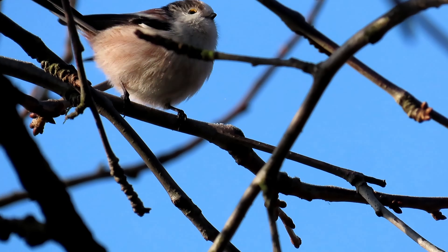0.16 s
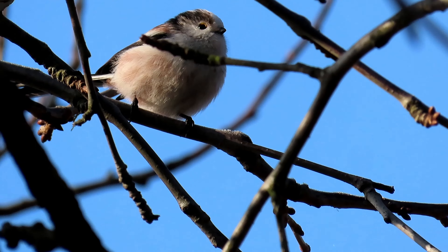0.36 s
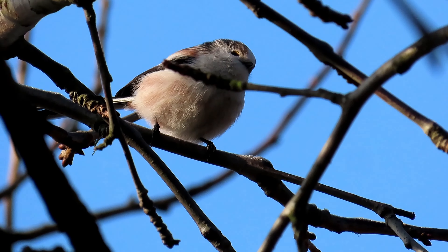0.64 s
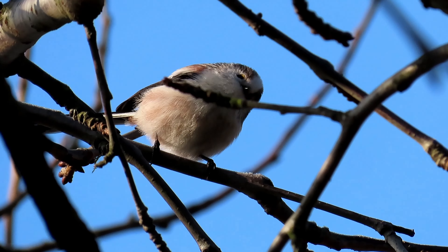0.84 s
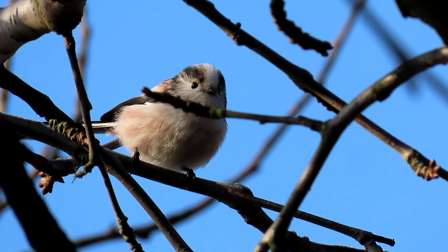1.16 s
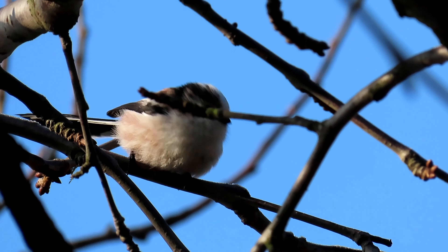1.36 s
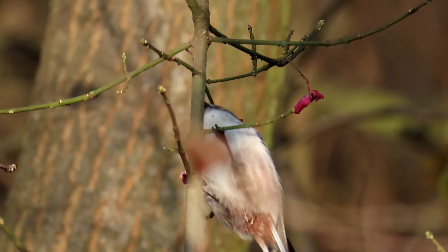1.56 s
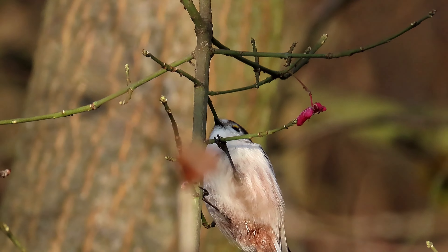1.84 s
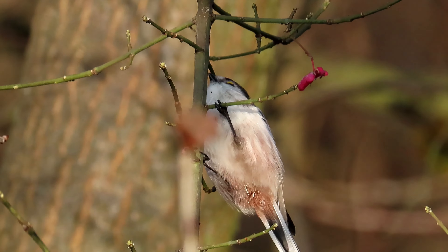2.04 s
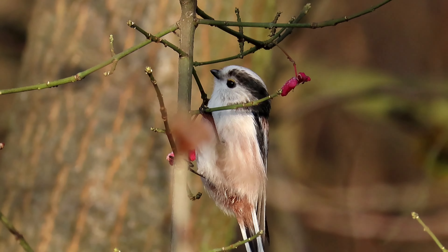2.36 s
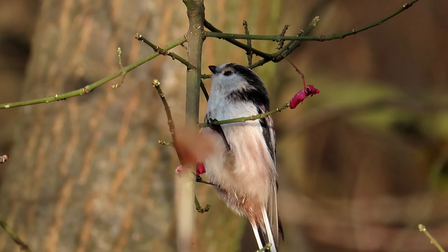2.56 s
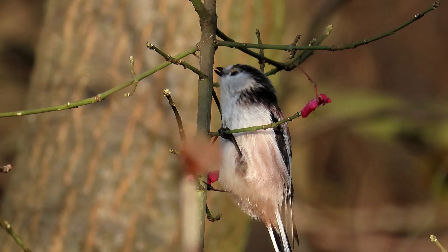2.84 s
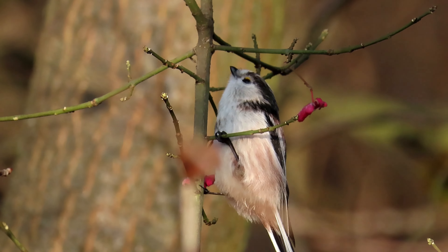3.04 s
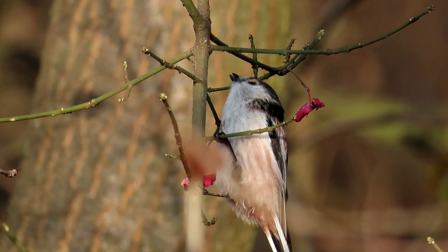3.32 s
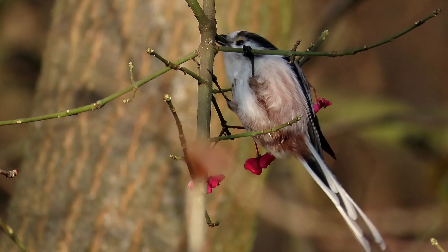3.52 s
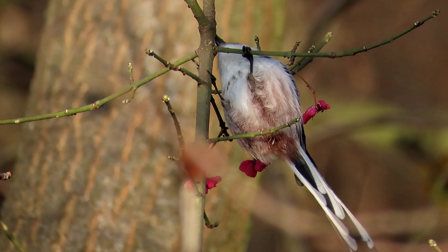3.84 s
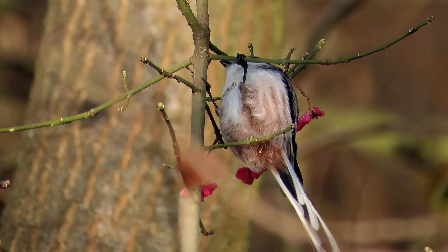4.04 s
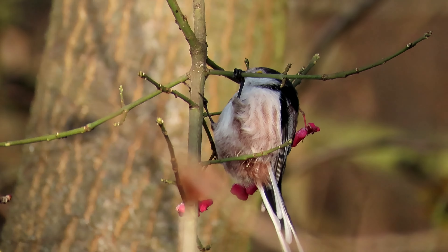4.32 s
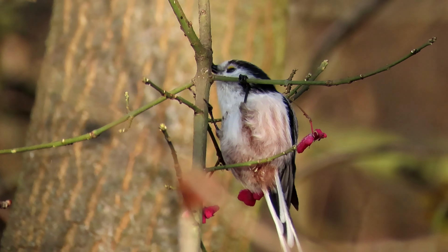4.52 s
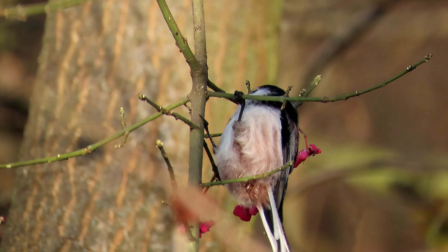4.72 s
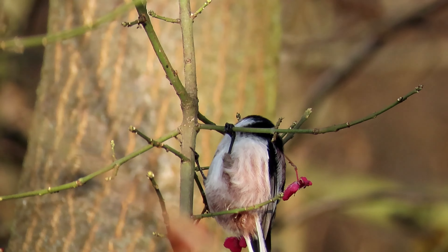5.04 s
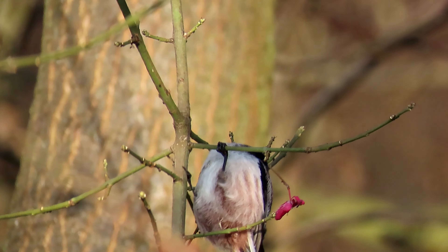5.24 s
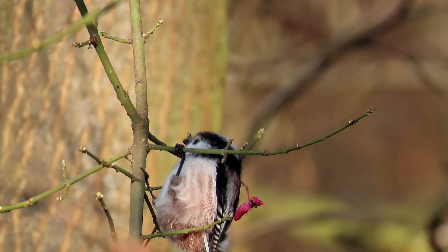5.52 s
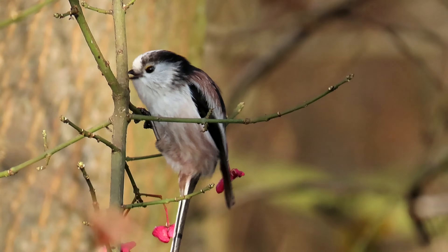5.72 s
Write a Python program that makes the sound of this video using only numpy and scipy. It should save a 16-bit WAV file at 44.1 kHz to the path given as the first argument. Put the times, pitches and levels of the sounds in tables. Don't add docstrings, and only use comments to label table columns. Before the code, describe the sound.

Quiet outdoor hiss, a faint sagging whistle, then five short sinking trills from a nearby tit, and thin blurred birdsong far off.

```python
import sys
import numpy as np
from scipy import signal
from scipy.fft import rfft, irfft
from scipy.io import wavfile
from scipy.ndimage import uniform_filter1d

SR = 44100
rng = np.random.default_rng(int(sys.argv[2]) if len(sys.argv) > 2 else 0)


def wav_out(sig):
    wavfile.write(sys.argv[1], SR, np.round(np.clip(np.atleast_2d(sig).T, -1, 1) * 32767).astype(np.int16))


def amplitude_ratio(level_db):
    exponent = np.asarray(level_db, float) / 20
    return 10 ** exponent


N = 259308


def evened(x):
    return x / np.sqrt(np.mean(x ** 2) + 1e-20)


def add(mix, s, sound):
    part = mix[round(s * SR):][:len(sound)]
    part += sound[:len(part)]


def colour(x, points):
    f, db = np.transpose(points)
    hz = np.fft.rfftfreq(len(x), 1 / SR)
    gain = amplitude_ratio(np.interp(np.log(hz + 1), np.log(f), db))
    return irfft(rfft(x) * gain, len(x))


def wander(size, count):
    smooth = uniform_filter1d(rng.standard_normal(size), count)
    return evened(uniform_filter1d(smooth, count))


def hiss():
    # (frequency [Hz], density [dB per Hz])
    noise_floor = [(20, -6.5), (40, -46), (52, -18), (70, -32), (125, -35.5), (275, -28), (360, -14),
                   (1100, -14.5), (1500, -18.5), (2900, -16.5), (4000, -10), (5900, -9.5), (8500, 0),
                   (12500, -13.5), (15900, -18.5)]
    level_db = -62.5 + 0.06 * wander(N, count=4000)
    return amplitude_ratio(level_db) * evened(colour(rng.standard_normal(N), noise_floor))


def whistle(flutter_hz=19.0, flutter_db=4.0):
    # (time [s], frequency [Hz])
    sag = [(0, 2245), (.1, 2210), (0.399, 2185), (0.641, 2155), (.8, 2060), (1.051, 2005), (1.38, 1985)]
    # (crest time [s], width [s], level [dB], octave level [dB])
    swells = [(0.043, 0.032, -64.5, -70.5), (0.126, 0.035, -57, -65.5), (.2, 0.057, -69, -75),
              (.32, 0.046, -58, -71.5), (.39, 0.074, -66.5, -70.5), (.54, .045, -61, -61.5),
              (0.631, 0.044, -62, -71.5), (.79, .07, -66, -92), (.93, .06, -74, -98),
              (1.06, 0.05, -72, -89), (1.16, 0.053, -68, -82), (1.3, 0.079, -87, -100)]
    twelfth_db = -12.5
    calm_s = .75
    s, hz = np.transpose(sag)
    t = np.arange(s[0], s[-1], 1 / SR)
    crest, width, tone_db, octave_db = np.transpose(swells)[:, :, None]
    swell = np.exp(-((t - crest) / width) ** 2)
    hz = np.interp(t, s, hz) + flutter_hz * wander(len(t), count=60)
    turn = 2 * np.pi * np.cumsum(hz) / SR
    unrest_db = flutter_db * np.where(t < calm_s, 1, .3)
    tone = np.zeros(len(t))
    for k, db in enumerate([tone_db, octave_db, octave_db + twelfth_db]):
        level = (amplitude_ratio(db) * swell).sum(0)
        flutter = amplitude_ratio(unrest_db * wander(len(t), count=200))
        tone += level * flutter * np.sin((k + 1) * turn)
    return sag[0][0], np.sqrt(2) * tone


def note(db, lead_hz, valley_hz, top_hz, end_hz, glide=.011):
    high = lead_hz > 6500
    glide = glide if high else .0005
    rise_hz, drop_hz = top_hz - valley_hz, top_hz - end_hz
    climb, fall = rise_hz / 1.05e6, top_hz / 1.2e6
    knots = np.cumsum([0, glide * 0.36, glide * .6, .0025, .0012, .0015,
                       climb * .72, climb * .28, fall * .2, fall * 0.44, fall * .38, .002])
    bend_hz = valley_hz + 0.1956 * (lead_hz - valley_hz)
    pitch = [lead_hz * .85, lead_hz * .96, lead_hz, bend_hz, valley_hz, valley_hz,
             top_hz - 0.131 * rise_hz, top_hz, top_hz - 0.1596 * drop_hz, top_hz - .8 * drop_hz, end_hz, end_hz]
    if high:
        level_db = [-10, -8.5, 2.0, 4.5, -15.5, 0.0, 1.5, -4.5, -1, -4.5, -2.5, -13.5]
    else:
        level_db = [-17, -3, -19, -7, -4.5, -5.5, 0.5, -6.0, -3.0, -2.0, -1.5, -34.5]
    t = np.arange(0, knots[-1], 1 / SR)
    hz = uniform_filter1d(np.interp(t, knots, pitch), size=60, mode="nearest")
    turn = 2 * np.pi * (np.cumsum(hz) / SR + rng.random())
    tone = np.sin(turn)
    slack_db = -8 - 0.37 * hz / 1000
    for k in range(4):
        audible = (k + 2) * hz < SR / 2.5
        tone += amplitude_ratio(slack_db - 4.4 * k) * np.sin((k + 2) * turn) * audible
    snap = np.exp(-((t - knots[4]) / 0.0037) ** 2)
    rasp = amplitude_ratio(-15 if high else -4.5) * wander(len(t), count=4)
    tone += snap * (amplitude_ratio(-32) * np.sin(turn / 2) + rasp)
    tremor_db = 1.8 * wander(len(t), count=34)
    swell = amplitude_ratio(db + np.interp(t, knots, level_db) + tremor_db)
    return knots[7], tone * swell * signal.windows.tukey(len(t), .08)


def grove(x):
    # (delay [s], level [dB])
    echoes = [(.0028, -5), (.0055, -7.5), (.0085, -9.5), (0.0135, -17.5)]
    # (frequency [Hz], level [dB])
    bark = [(1500, -12), (3000, -12), (4200, -8.5), (5200, 5), (5900, 2.5), (7000, -4.5), (8200, -4),
            (10000, -7)]
    taps = np.zeros(SR // 2)
    at = np.arange(60, len(taps) - 20, 20)
    taps[at + rng.integers(0, 20, len(at))] = rng.choice([-1., 1.], len(at))
    t = np.arange(len(taps)) / SR
    near = amplitude_ratio(-18 - 60 * t / .075)
    far = amplitude_ratio(-23.5 - 60 * t / 0.27)
    ground = amplitude_ratio(-25) * np.exp(-((t - .022) / 0.0012) ** 2)
    taps *= near + far + ground
    for s, db in echoes:
        taps[round(s * SR)] += amplitude_ratio(db)
    return signal.oaconvolve(x, colour(taps, bark))[:len(x)]


def tit():
    # (arch top time [s], level [dB])
    rattles = [
        [(.750, -28.5), (.777, -28.5), (.804, -30.5), (.833, -30.5), (.8643, -35), (.8945, -40.5),
         (.939, -30.5), (.972, -33.5), (1.0139, -31.5), (1.051, -35.5), (1.098, -34)],
        [(1.525, -30), (1.553, -29.5), (1.580, -30.5), (1.612, -29), (1.6456, -29), (1.685, -27.5),
         (1.721, -30), (1.765, -30)],
        [(2.700, -30), (2.727, -30.5), (2.754, -29), (2.785, -30), (2.8215, -30.5), (2.8595, -30.5),
         (2.8965, -31.5), (2.939, -29.5), (2.9732, -31.5)],
        [(3.404, -32.5), (3.432, -31.5), (3.462, -30.5), (3.4953, -29), (3.5323, -31), (3.567, -31),
         (3.610, -29.5), (3.6507, -31)],
        [(5.238, -31.5), (5.264, -30.5), (5.294, -31.5), (5.328, -30.5), (5.366, -30.5), (5.4022, -32),
         (5.443, -33.5), (5.4838, -32), (5.5225, -31.5)],
    ]
    # (echo [dB], low [dB], middle [dB], treble [dB], first glide [s])
    poses = [(0.6, 2.5, 1, -0.7, .0115), (1.6, 0.3, 0, -1.4, 0.0032), (1.45, 0.9, 2.5, -0.7, 0.0069),
             (4, 0.4, 2.5, -4.5, 0.0081), (2.5, 1.2, 1, 0, 0.014)]
    # (first valley [Hz], second valley [Hz], held top [Hz], throat ring [dB])
    tensions = [(5660, 5020, 5800, 0), (4520, 5390, 5500, 1.5), (4600, 4590, 5650, -0.5),
                (4290, 4640, 5450, 1.5), (5910, 5390, 5250, -1.4)]
    # (lead [Hz], valley [Hz], top [Hz], end [Hz])
    slackening = [(8370, 4900, 9830, 7730), (8650, 5000, 9620, 7880), (8190, 3450, 9000, 1700),
                  (4486, 1640, 7300, 1600), (4150, 1260, 6140, 1430), (3946, 1200, 5450, 1420)]
    # (frequency [Hz], level [dB])
    beak = [(400, -71), (900, -32), (1500, -30), (2500, -17.5), (3500, -7), (4300, 5.5), (5200, -6.5),
            (6500, -0.5), (8000, 4), (9500, -4.5), (10800, -12.5), (12000, -48)]
    tiring_hz = 59.6
    out = np.zeros(N)
    for rows, pose, (*dives_hz, held_hz, ring_db) in zip(rattles, poses, tensions):
        wet_db, low_db, middle_db, treble_db, first_glide = pose
        start, call = rows[0][0] - .1, np.zeros(SR)
        for k, (s, db) in enumerate(rows):
            held = max(k + 1 - len(slackening), 0)
            lead_hz, valley_hz, top_hz, end_hz = slackening[k - held]
            if k < len(dives_hz):
                valley_hz = dives_hz[k]
            if held:
                top_hz = held_hz - tiring_hz * held
            glide = first_glide if k == 0 else .011
            before, sound = note(db, lead_hz, valley_hz, top_hz, end_hz, glide)
            add(call, s - start - before, sound)
        facing = [(4400, low_db), (5250, ring_db), (6100, middle_db), (8000, treble_db)]
        call = colour(colour(call, beak), facing)
        add(out, start, call + amplitude_ratio(wet_db) * grove(call))
    return out


def knock(db, hz):
    t = np.arange(0, .021, 1 / SR)
    return amplitude_ratio(db) * np.hanning(len(t)) ** 1.3 * np.sin(2 * np.pi * hz * t)


def song():
    # (time [s], level [dB], start [Hz], end [Hz], length [s])
    phrase = [(4.35, -68, 7060, 6840, .06), (4.43, -75, 6870, 6850, .06), (4.515, -67, 7160, 6780, .075),
              (4.61, -75, 6790, 6750, .05), (4.65, -69, 5370, 5330, .04), (4.735, -70, 5370, 5310, .055),
              (4.77, -72, 5200, 5110, .04), (4.815, -72, 5210, 5180, .04), (4.86, -68, 5210, 5110, .075),
              (4.955, -62, 5170, 5190, .045), (5.005, -69, 5210, 5220, .07), (5.075, -63, 5210, 5180, .06),
              (5.135, -71, 5220, 5210, .05), (5.185, -63, 5200, 5150, .045)]
    flutter_hz = 60
    dry = np.zeros(N)
    for s, db, start_hz, end_hz, length in phrase:
        count = round(length * SR)
        hz = np.linspace(start_hz, end_hz, count) + flutter_hz * wander(count, count=50)
        tone = np.sin(2 * np.pi * np.cumsum(hz) / SR)
        add(dry, s, amplitude_ratio(db + 6) * np.hanning(count) ** 0.56 * tone)
    t = np.arange(SR // 3) / SR
    scatter = rng.standard_normal(len(t)) * amplitude_ratio(-60 * t / 0.59)
    scatter /= np.linalg.norm(scatter)
    return dry + amplitude_ratio(-3.0) * signal.oaconvolve(dry, scatter)[:N]


def scene():
    # (time [s], peak level [dB], frequency [Hz])
    knocks = [
        (1.193, -66.5, 450),
        (1.214, -61.5, 400),
        (1.246, -63, 400),
        (1.264, -61.5, 393),
        (1.325, -64, 400),
        (2.896, -72, 425),
        (2.93, -75, 386),
    ]
    mix = hiss() + tit() + song()
    add(mix, *whistle())
    for s, db, hz in knocks:
        add(mix, s - .003, knock(db, hz))
    return mix[None]


def band_limit(x):
    return signal.sosfilt(signal.butter(12, 15820, fs=SR, output="sos"), x)


def record(dry):
    return band_limit(dry)


dry = scene()
out = record(dry)
wav_out(out)
```